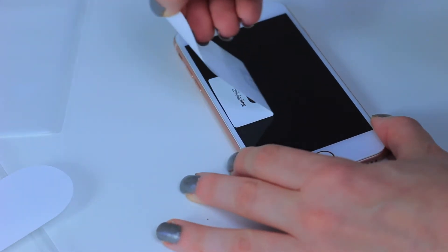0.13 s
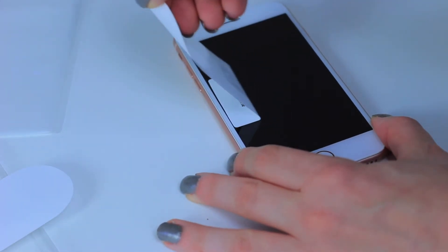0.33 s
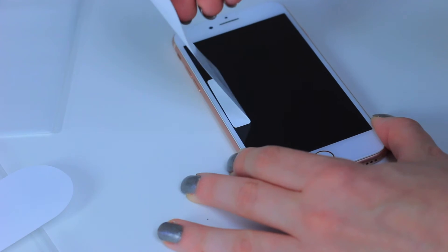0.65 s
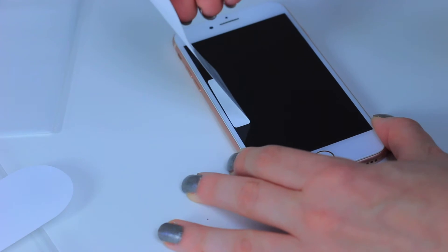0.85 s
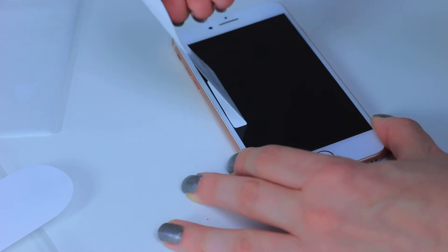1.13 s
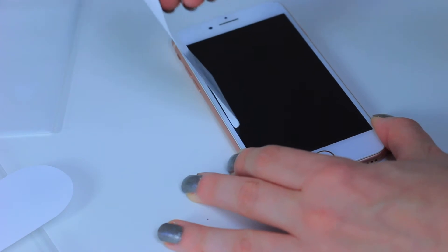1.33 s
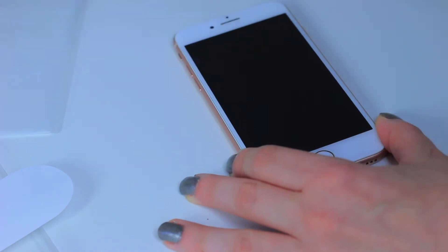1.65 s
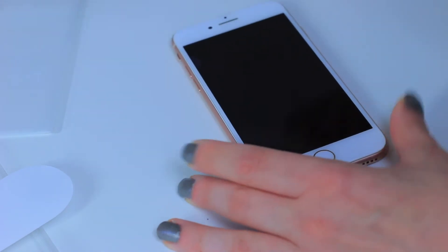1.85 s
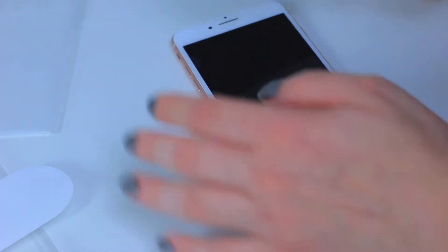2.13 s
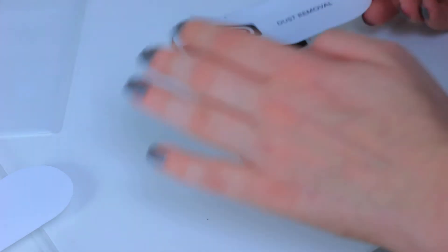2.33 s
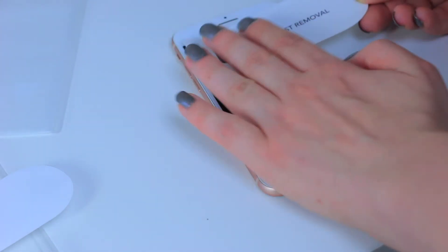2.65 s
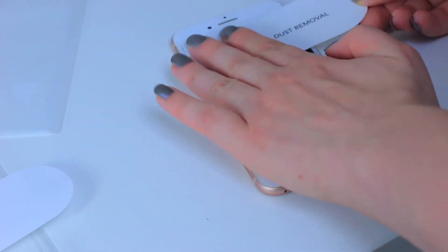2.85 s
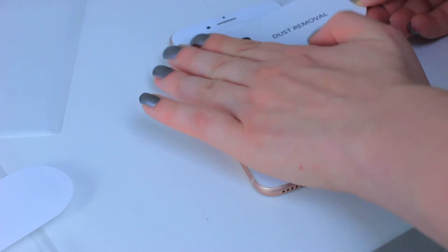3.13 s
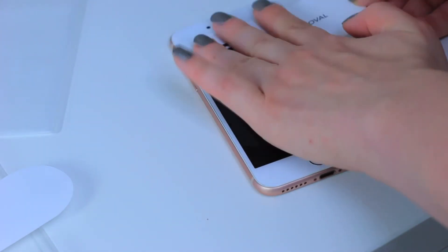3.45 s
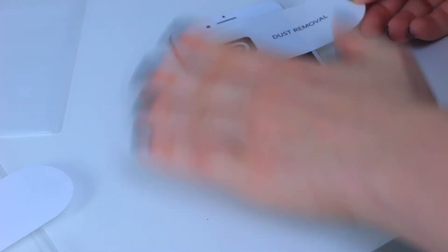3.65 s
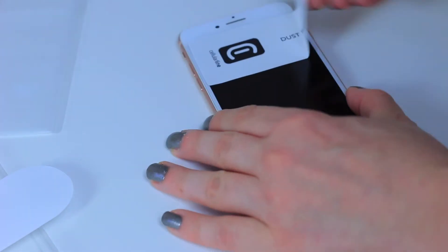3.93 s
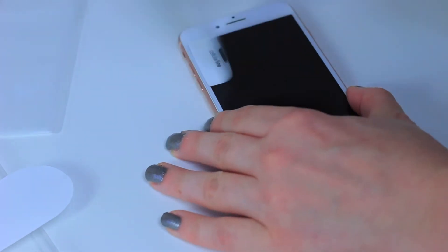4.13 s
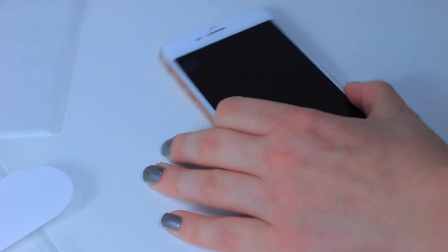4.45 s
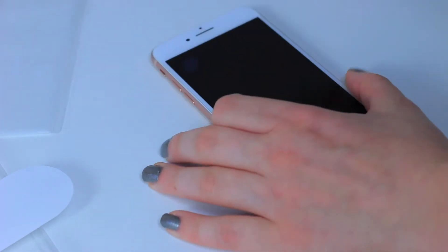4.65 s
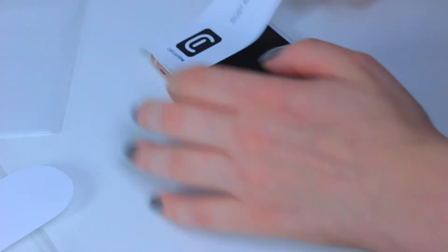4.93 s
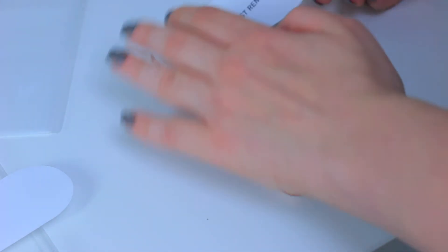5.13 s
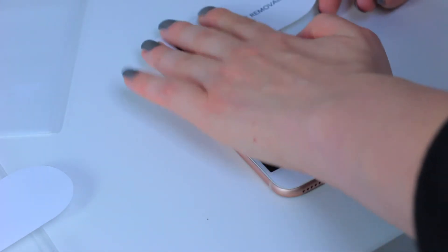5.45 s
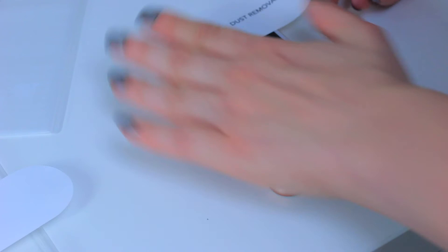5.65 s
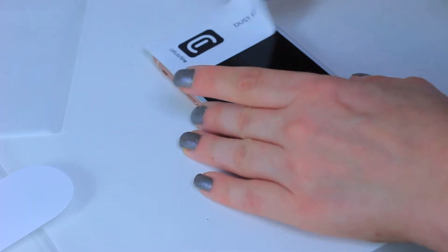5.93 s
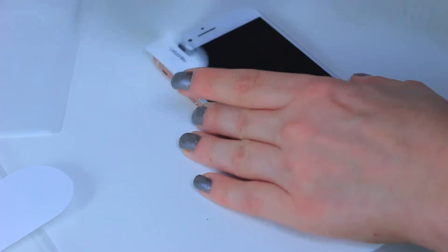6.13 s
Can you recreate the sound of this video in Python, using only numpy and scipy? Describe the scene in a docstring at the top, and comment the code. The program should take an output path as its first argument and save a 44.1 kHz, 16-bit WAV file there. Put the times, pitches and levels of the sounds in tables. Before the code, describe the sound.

A sticky sheet creeps off a phone's glass, ends in one sharp crack, then soft pats and two quick crackling rips ring in a bare room.

```python
"""Peeling an adhesive sheet from glass

A sticky dust-remover sheet is patted onto the glass of a phone on a table, and peeled off, in a bare, ringing room.
The first peel creeps and ends in one sharp crack; two later ones are quick rips: dense clicks of breaking glue threads.
Pats are soft force pulses that excite damped modes of phone and table; sliding hand and phone give stick-slip grains.
Standing waves, a diffuse tail and one wall echo surround them, over steady hiss and a faint rumble."""
import sys
import numpy as np
from scipy import signal
from scipy.fft import rfft, irfft
from scipy.io import wavfile

SR = 44100
rng = np.random.default_rng(int(sys.argv[2]) if len(sys.argv) > 2 else 0)


def output_pcm(signal):
    """Save a mono or channel-first signal as 16-bit PCM at the path in sys.argv[1].

    Samples are clipped to [-1, 1] before scaling.
    """
    pcm = np.clip(np.atleast_2d(signal).T, -1, 1) * 32767
    wavfile.write(sys.argv[1], SR, np.round(pcm).astype(np.int16))


N = 277830
TIME = np.arange(N) / SR

# rips at a steady pull; rattle_db is the sheet's rattle relative to the rip, halfway through:
# start_s, end_s, rip_db, rattle_db
RIPS = [(-0.1, 0.011, -46.5, -22), (4.05, 4.182, -31, 0.5), (6.016, 6.223, -34, 2.5)]
# the largest patches of glue let go: time_s, level_db
GLUE_SNAPS = [(0.506, -33.5), (0.599, -30.5), (3.9993, -20.5), (4.0149, -15.5), (4.045, -7), (4.062, -5.5),
              (4.1195, -12), (4.214, -5), (5.995, -12), (6.0077, -7), (6.0712, -12.5), (6.0935, -9),
              (6.1091, -5), (6.134, -2.5), (6.1541, -6.5), (6.1777, -5), (6.205, -14)]
# fingers pat or nudge the phone, or the sheet tugs it: time_s, strength_db
TOUCHES = [(0.226, -29), (0.727, -32.5), (1.103, -26.5), (1.3456, -21.5), (1.3969, -5), (1.789, -28),
           (2.868, 4), (3.306, -33), (3.455, -16.5), (3.4707, 2.5), (3.826, -20), (4.044, -7.5),
           (4.119, -4.5), (5.3649, 5.5), (5.8222, 1.5)]


def from_db(db):
    """Amplitude ratio of a level: 20 dB per factor of ten."""
    return 10 ** (np.asarray(db) / 20)


def unit_energy(x):
    """Energy normalisation: the squares sum to one."""
    return x / np.sqrt(np.sum(x ** 2) + 1e-20)


def at_hz(points, hz):
    """Linear interpolation of a table on a log-frequency axis."""
    f, value = np.transpose(points)
    return np.interp(np.log(np.maximum(hz, 1)), np.log(f), value)


def through(x, response):
    """Linear system: convolution with an impulse response."""
    return signal.oaconvolve(x, response)[:N]


def colour(x, spectrum, size=4096):
    """Minimum-phase filtering: a folded cepstrum makes the response causal; white input keeps its power."""
    hz = np.arange(size // 2 + 1) * SR / size
    cepstrum = irfft(np.log(from_db(at_hz(spectrum, hz))))
    cepstrum[1:size // 2] *= 2
    cepstrum[size // 2 + 1:] = 0
    response = irfft(np.exp(rfft(cepstrum)))
    return through(x, unit_energy(response))


def resonance(x, hz, width_hz):
    """Damped oscillator: a pole pair whose radius sets the bandwidth, with gain one on top."""
    r = np.exp(-np.pi * width_hz / SR)
    zeros = np.array([1, 0, -1]) * (1 - r * r) / 2
    poles = [1, -2 * r * np.cos(2 * np.pi * hz / SR), r * r]
    return signal.lfilter(zeros, poles, x + 1e-18)


def add(track, s, sound):
    """Superposition: mix a short sound into a track at time s."""
    start = int(np.clip(round(s * SR), 0, N - 1))
    track[start:start + len(sound)] += sound[:N - start]


def stereo_noise(size, likeness):
    """Partial coherence: mid and side noise are weighted to give the tabled left-right correlation by band."""
    mid, side = rfft(rng.standard_normal((2, size)))
    hz = np.arange(len(mid)) * SR / size
    alike = np.clip(at_hz(likeness, hz), -1, 1)
    return hz, np.sqrt((1 + alike) / 2) * mid + np.sqrt((1 - alike) / 2) * side * [[1], [-1]]


def grains(per_s, spread_db, clump_db, clumps_per_s):
    """Stick-slip: tiny random clicks of uneven size come in clumps; rms one."""
    size_db = spread_db * np.minimum(rng.exponential(1, N), 4)
    sizes = from_db(size_db) * rng.choice([-1, 1], N)
    occurs = rng.random(N) < per_s / SR
    grip = np.interp(TIME * clumps_per_s, np.arange(N), np.clip(rng.standard_normal(N), -2, 2))
    return np.sqrt(N) * unit_energy(sizes * occurs * from_db(clump_db * grip))


def burst(decay_s, size=2048, count=8):
    """Avalanche: decaying micro-clicks, their spectrum flattened so that they have no pitch; energy one."""
    age = TIME[:size] / np.clip(decay_s, .0002, .01)
    clicks = rng.standard_normal(size) * np.exp(-age / 2)
    for _ in range(count):
        flat = irfft(np.exp(1j * np.angle(rfft(clicks))))
        clicks = flat * np.clip(4 - age, 0, 1)   # fade out between three and four decay times
    return unit_energy(clicks)


def swell(start, end, attack_s, release_s):
    """Exponential growth and decay: gain is one from start to end; attack and release span 60 dB."""
    before, after = np.maximum(start - TIME, 0), np.maximum(TIME - end, 0)
    return from_db(-60 * (before / attack_s + after / release_s))


def peel(attack_s=0.11, release_s=0.11, rattle_growth_db_per_s=27):
    """Fracture noise: glue threads break by the thousand; the growing free part of the sheet rattles with them."""
    # spectra of breaking threads and rattling sheet: frequency_hz, level_db
    rip_spectrum = [(30, -39), (150, -19), (700, -4), (2000, -13.5), (3800, 0.5), (6000, -3), (9000, -1),
                    (12000, -5.5), (16000, -11)]
    sheet_spectrum = [(70, -30), (180, 7), (450, -4.5), (900, 5.5), (1300, 1.5), (2200, 4), (3200, 1.5),
                      (5000, 0), (9000, -3.5), (16000, -11)]
    pull, shake = np.zeros((2, N))
    for start, end, db, rattle_db in RIPS:
        rip = from_db(db) * swell(start, end, attack_s, release_s)
        past_halfway_s = np.clip(TIME, start, end) - (start + end) / 2
        pull += rip
        shake += rip * from_db(rattle_db + rattle_growth_db_per_s * past_halfway_s)
    threads = grains(per_s=4000, spread_db=4.0, clump_db=4.0, clumps_per_s=280)
    rattle = grains(per_s=2500, spread_db=3.0, clump_db=3.0, clumps_per_s=200)
    return colour(pull * threads, rip_spectrum) + colour(shake * rattle, sheet_spectrum)


def small_snaps(count=40, gap_s=0.011, lead_s=0.045):
    """Stick and slip: uneven little snaps announce each rip and go on through it; rows of time_s, level_db."""
    over_rip_db, scatter_db, growth_db_per_s = 13.5, 5.5, 206   # growth acts only before the rip starts
    rows = []
    for start, end, db, _ in RIPS:
        times = start - lead_s + gap_s * (np.arange(count) + rng.uniform(-.5, .5, count))
        levels = db + over_rip_db + scatter_db * rng.standard_normal(count)
        levels -= growth_db_per_s * np.maximum(start - times, 0)
        rows += [(s, level) for s, level in zip(times, levels) if 0 < s < end]
    return rows


def snaps(snap_db=1.0, avalanche_s=0.0007, avalanche_db=-1.0, count=12):
    """Sudden release: a patch of glue gives way with a click and tears its neighbours along."""
    # spectrum of a snap: frequency_hz, level_db
    snap_spectrum = [(30, -55), (150, -34), (700, -6), (2000, -9.5), (3800, 2.5), (6000, 3), (9000, 2),
                     (12000, -1), (16000, -12)]
    out = np.zeros(N)
    avalanches = [burst(avalanche_s) for _ in range(count)]
    for k, (s, db) in enumerate(list(GLUE_SNAPS) + small_snaps()):
        add(out, s, from_db([db]))
        add(out, s, from_db(db + avalanche_db) * avalanches[k % count])
    return from_db(snap_db) * colour(out, snap_spectrum)


def flicks(flutter_s=0.0058, crinkle_db=-35):
    """Elastic release: the springing or patted sheet cracks, then flutters briefly; returns both."""
    # the sheet springs free or buckles: time_s, crack_db, flutter_db
    releases = [(1.392, -14, -6), (1.3961, 1.5, 1), (3.469, -26, -30.5), (3.826, -35, -35),
                (4.907, -26.5, -41)]
    # spectra of crack and papery flutter: frequency_hz, level_db
    crack_spectrum = [(30, -45), (150, -7), (1000, -1.5), (3500, 5), (8000, 0.5), (12000, -5), (16000, -9)]
    flutter_spectrum = [(30, -24), (150, -39), (450, -10), (750, -20), (1200, -7.5), (1600, -5.5),
                        (2700, 0), (4500, -5.5), (8000, -8), (12000, -12.5), (16000, -20)]
    crinkles = [(s, db + crinkle_db, db + crinkle_db) for s, db in TOUCHES]   # under the fingers
    crack, flutter = np.zeros((2, N))
    for s, crack_db, flutter_db in list(releases) + crinkles:
        add(crack, s, from_db([crack_db]))
        add(flutter, s, from_db(flutter_db) * burst(flutter_s))
    return colour(crack, crack_spectrum), colour(flutter, flutter_spectrum)


def pats(knock_s=0.002217, knock_db=4.5, bass_hz=125, jolt_db=-12, mode_scatter_db=1.5, size=2048):
    """Modal impact: fingertips or a snap's jolt excite the phone; a moment later it knocks dully on the table."""
    # heavily damped modes of the phone under the hand and the table top: frequency_hz, width_hz, level_db
    phone_modes = [(690, 280, -4), (970, 140, 3), (1493, 130, -3), (2300, 1800, -7.5), (3280, 450, -19)]
    table_modes = [(221, 72, 2), (304, 150, -6), (515, 63, -2.5)]
    radiation = signal.butter(3, bass_hz, "high", fs=SR, output="sos")   # small bodies radiate little bass
    jolts = [(s, db + jolt_db) for s, db in GLUE_SNAPS]
    out = np.zeros(N)
    for s, db in list(TOUCHES) + jolts:
        contact_hz = 547 + 850 * from_db(db)   # a firmer pat is brighter
        soft = signal.butter(3, min(contact_hz, SR / 4), fs=SR, output="sos")
        force = signal.sosfilt(soft, signal.unit_impulse(size))
        late = from_db(knock_db) * np.interp(TIME[:size] - knock_s, TIME[:size], force, left=0)
        slap = 0
        for hz, width, mode_db in phone_modes:
            # each touch lands on another spot and excites the modes differently
            touch_db = mode_db + mode_scatter_db * rng.standard_normal()
            slap = slap + from_db(touch_db) * resonance(force, hz, width)
        knock = sum(from_db(mode_db) * resonance(late, hz, width) for hz, width, mode_db in table_modes)
        body = signal.sosfilt(radiation, slap + knock)
        add(out, s, from_db(db) * unit_energy(body))
    return out


def nail_ticks(touch_s=0.00058):
    """Modal ringing: a fingernail catches the edge of the phone, which rings very briefly."""
    # ticks of the nail: time_s, level_db
    ticks = [(4.907, -12), (4.92, -26)]
    # modes of the edge: frequency_hz, width_hz, level_db
    edge_modes = [(1290, 1700, -1), (3060, 620, 3), (5060, 470, -24)]
    touches = np.zeros(N)
    for s, db in ticks:
        add(touches, s, from_db(db) * burst(touch_s))
    return sum(from_db(db) * resonance(touches, hz, width) for hz, width, db in edge_modes)


def rubbing(braking_db_per_s=106):
    """Dry friction: skin and phone catch and slip on the table top."""
    # skin drags briefly on the table: time_s, level_db
    skin_drags = [(0.01, -43.5), (3.845, -47), (3.944, -43), (5.882, -43)]
    # the phone is shoved across the table: start_s, stop_s, start_level_db
    phone_shoves = [(3.925, 3.96, -44), (4.444, 4.61, -33), (4.725, 4.733, -57.5), (5.918, 5.99, -45.5)]
    # spectra of skin and phone on the table: frequency_hz, level_db
    skin_spectrum = [(40, -12), (130, -9.5), (260, 7), (450, -8.5), (700, -11), (1200, -18), (3000, -24.5),
                     (12000, -47)]
    scuff_spectrum = [(50, -31), (150, -6), (350, -1.5), (700, -1.5), (1000, 2), (1250, -10.5),
                      (2000, -13.5), (4000, -26.5), (12000, -56)]
    drags = sum(from_db(db) * swell(s, s, attack_s=0.24, release_s=0.11) for s, db in skin_drags)
    shoves = np.zeros(N)
    for start, stop, db in phone_shoves:
        slowing_db = braking_db_per_s * np.maximum(TIME - start, 0)   # friction slows each shove
        shoves += from_db(db - slowing_db) * swell(start, stop, attack_s=0.18, release_s=0.11)
    hand = drags * grains(per_s=2500, spread_db=2.0, clump_db=3.5, clumps_per_s=70)
    phone = shoves * grains(per_s=1800, spread_db=2.0, clump_db=1.5, clumps_per_s=86)
    return colour(hand, skin_spectrum) + colour(phone, scuff_spectrum)


def table_bounce(x, left_s=0.00037, right_s=0.00046, bounce_db=-21.0):
    """Specular reflection: sound from above the table arrives again, a little sooner on the left."""
    gain = from_db(bounce_db)
    both = [x + gain * np.interp(TIME - lag, TIME, x) for lag in (left_s, right_s)]
    return np.array(both) / np.sqrt(1 + gain ** 2)


def far_wall(x, delay_s=0.049, echo_db=-10.0, cut_hz=1200):
    """Discrete echo: one dull reflection from the far wall stands out of the tail."""
    dull = signal.sosfilt(signal.butter(2, cut_hz, fs=SR, output="sos"), x + 1e-18)
    return from_db(echo_db) * np.interp(TIME - delay_s, TIME, dull, left=0)


def room(x, size=36000, count=24, wall_delay_s=0.00048, build_up_s=0.0065):
    """Reverberation: dense wall echoes build up and die band by band; a few standing waves ring on."""
    # decay of the diffuse tail: frequency_hz, t60_s
    decay_times = [(100, 0.59), (300, 0.6), (700, 0.51), (1200, 0.73), (3000, 0.57), (6000, 0.6),
                   (10000, 0.48), (16000, 0.25)]
    # spectrum of the diffuse tail: frequency_hz, level_db
    tail_spectrum = [(100, 6), (160, 0), (260, -2), (400, 4), (700, 0), (1500, 3), (3000, 3.5), (8000, 3),
                     (16000, 0.5)]
    # left-right likeness of the tail: frequency_hz, correlation
    tail_likeness = [(30, 0.78), (120, 0.98), (350, 0.99), (700, 0.88), (1400, 0.71), (2800, 0.25),
                     (5500, -0.18), (9000, -0.2), (15000, -0.2)]
    # standing waves of the room: frequency_hz, level_db, t60_s
    room_modes = [(123, 11, 0.84), (194.1, 14, 0.85), (282, -8.5, 0.72), (328.6, 0.5, 0.18),
                  (643, -6, 0.48), (717, 13, 0.84), (863, 0.5, 0.72), (1024, 4, 1)]
    hz, noise = stereo_noise(size, tail_likeness)
    age = np.maximum(TIME[:size] - wall_delay_s, 0)
    build_up = 1 - np.exp(-age / build_up_s)
    centres, tail = np.geomspace(80, 16000, count), 0
    for centre, pick in zip(centres, np.eye(count)):
        share = np.interp(np.log(hz + 1), np.log(centres), pick)   # overlapping triangular bands
        envelope = unit_energy(build_up * from_db(-60 * age / at_hz(decay_times, centre)))
        band = unit_energy(irfft(noise * share) * envelope) * np.sqrt(2 * np.mean(share ** 2))
        tail = tail + from_db(at_hz(tail_spectrum, centre)) * band
    standing = 0
    for f, db, t60 in room_modes:
        width_hz = np.log(1000) / (np.pi * t60)   # 60 dB is a factor of 1000
        standing = standing + from_db(db) * resonance(x, f, width_hz)
    return np.array([through(x, side) for side in tail]) + standing


def air(air_db=-58.5):
    """Stationary noise: microphone hiss, nearly independent in the two channels, over a faint room rumble."""
    # spectrum of hiss and rumble: frequency_hz, level_db
    air_spectrum = [(15, -48), (25, -8), (50, -7.5), (99, -6), (195, -1), (212, -2), (363, -6.5),
                    (416, -4.5), (489, -5.5), (714, -8), (1020, -7), (1260, -10), (6380, -14.5),
                    (16000, -20.5)]
    # left-right likeness of the noise: frequency_hz, correlation
    noise_likeness = [(50, 0.13), (130, 0.31), (700, 0.0055)]
    _, spectra = stereo_noise(N, noise_likeness)
    return from_db(air_db) * np.array([colour(side, air_spectrum) for side in irfft(spectra, N)])


def scene():
    """Direct and reverberant fields: each source arrives directly and, by its own share, through the room."""
    rip, snap, pat, tick, rub = peel(), snaps(), pats(), nail_ticks(), rubbing()
    crack, flutter = flicks()
    from_sheet = table_bounce(snap + crack + from_db(-3.5) * rip + from_db(-2.5) * flutter)
    direct = from_sheet + pat + tick + from_db(-5.0) * rub
    sheet_to_walls = from_db(-0.5) * snap + from_db(-15.0) * crack + from_db(-1.6) * rip + from_db(4.0) * flutter
    hand_to_walls = from_db(0.33) * pat + from_db(1.5) * tick + from_db(-5.5) * rub
    to_walls = sheet_to_walls + hand_to_walls
    balance = from_db([[0.2], [-0.2]])   # left, right
    return direct * balance + room(to_walls) + far_wall(to_walls) + air()


def record(dry, cutoff_hz=16200):
    """Band limiting: a steep elliptic low-pass cuts the top."""
    steep = signal.ellip(10, .1, 80, cutoff_hz, fs=SR, output="sos")   # 0.1 dB ripple, 80 dB rejection
    return signal.sosfilt(steep, dry)


dry = scene()
out = record(dry)
output_pcm(out)
```